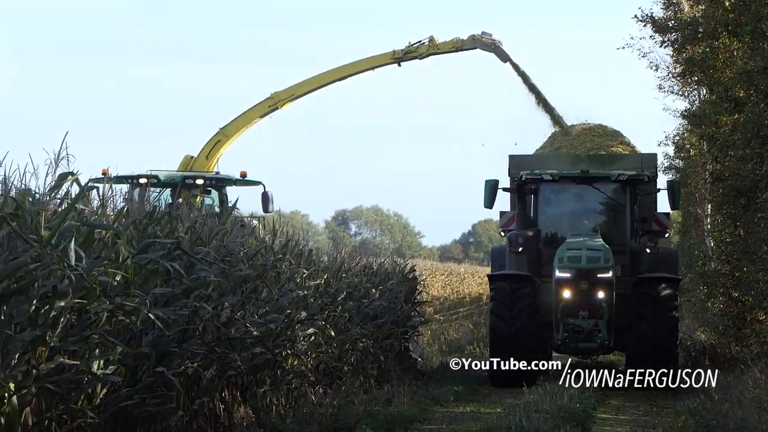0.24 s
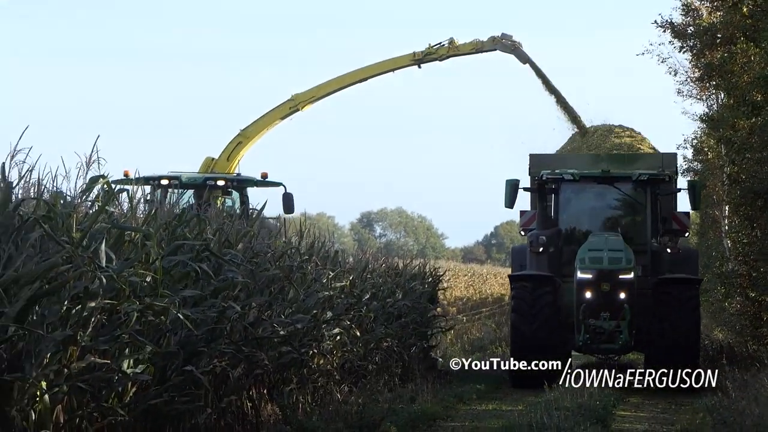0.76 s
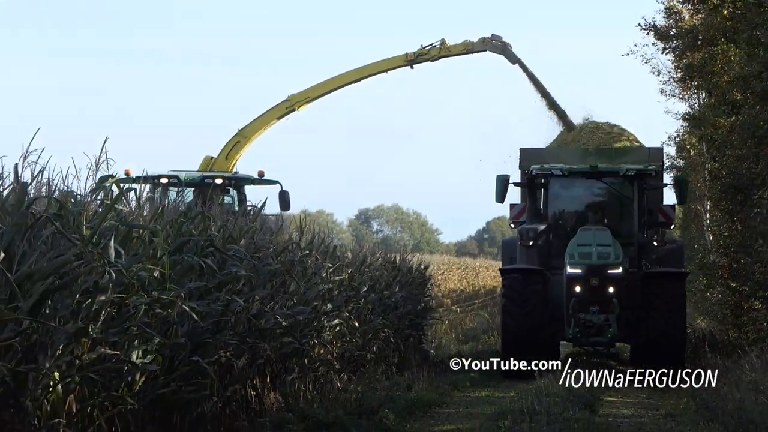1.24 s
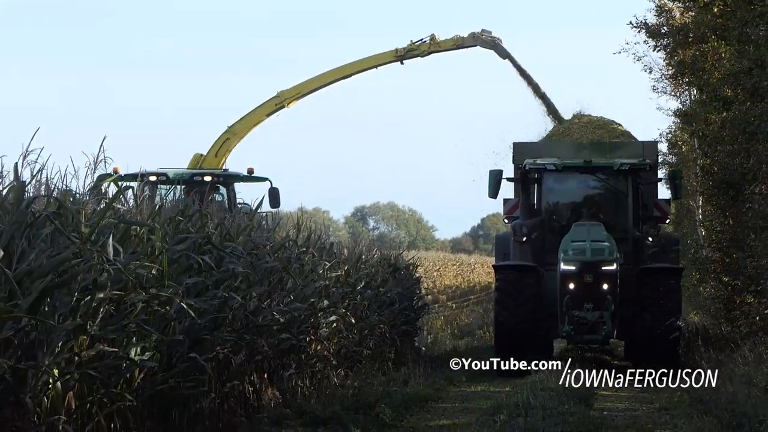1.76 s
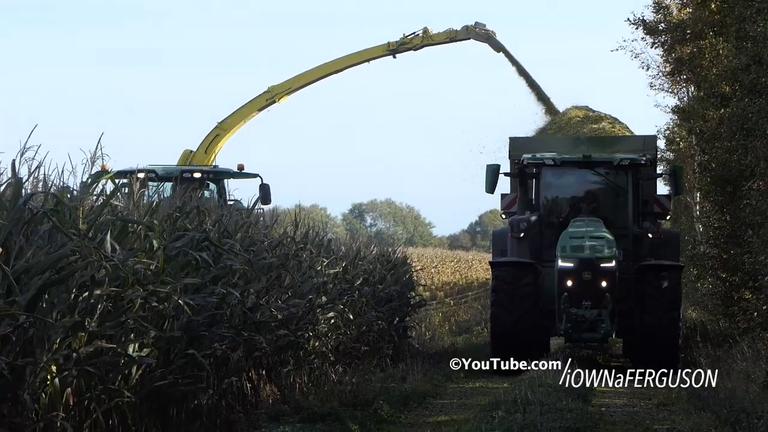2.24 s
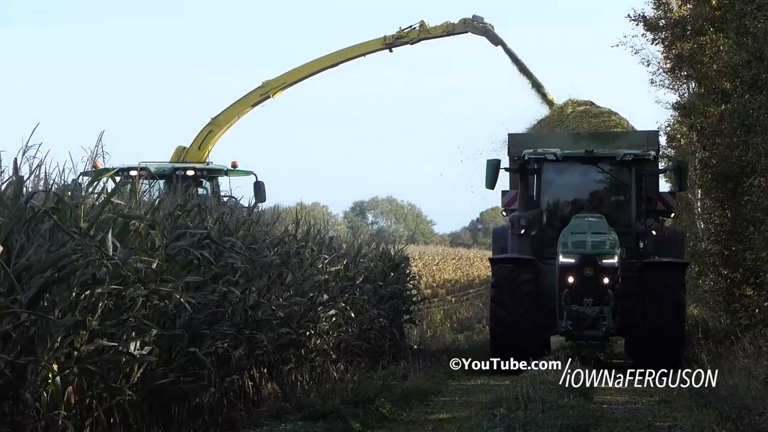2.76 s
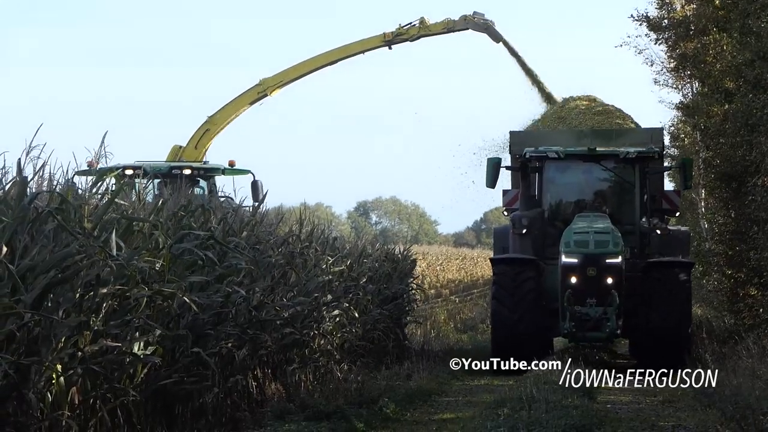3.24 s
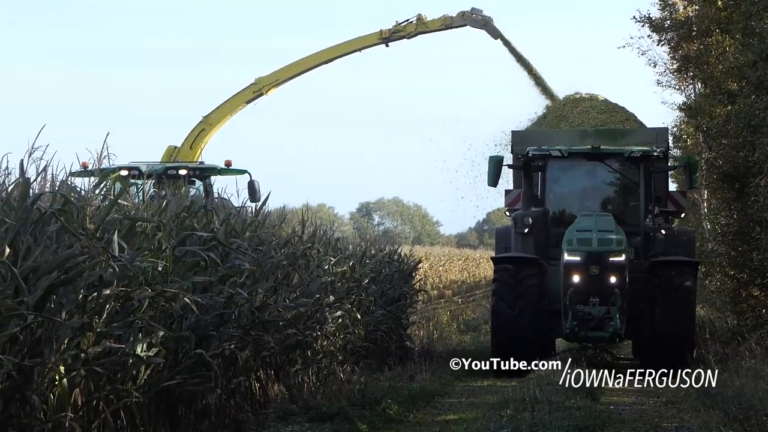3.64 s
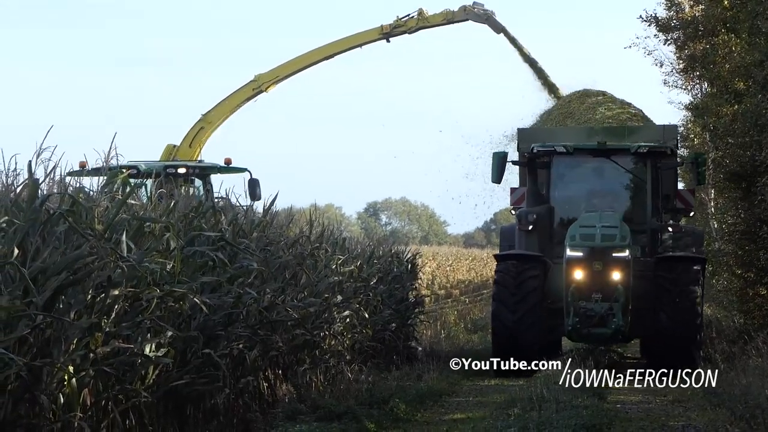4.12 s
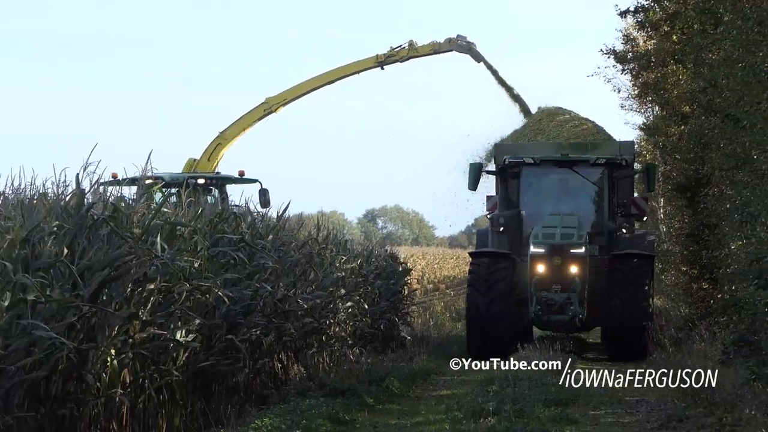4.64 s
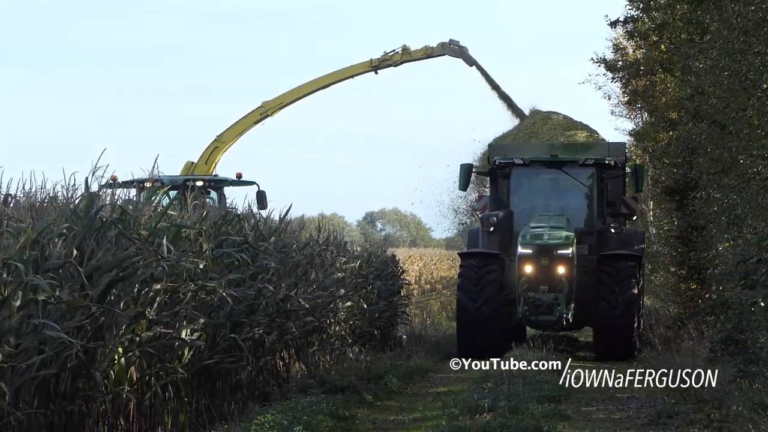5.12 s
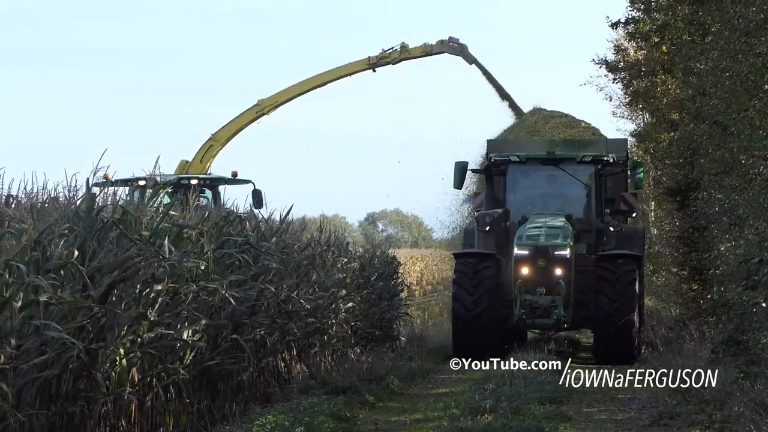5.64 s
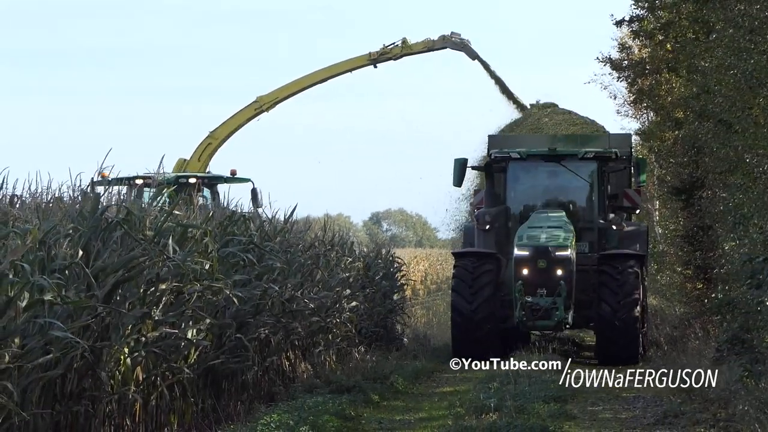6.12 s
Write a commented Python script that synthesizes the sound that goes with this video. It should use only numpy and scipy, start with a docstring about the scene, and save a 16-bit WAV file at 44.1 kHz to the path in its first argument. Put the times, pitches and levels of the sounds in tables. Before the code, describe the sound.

A forage harvester works in a maize field beside a tractor and trailer. A thick low roar and engine drone run throughout, with a knife drum humming and throbbing unevenly. Chopped crop hisses, crunches and rattles through the ringing steel spout. Thin whistles appear after four seconds, and squeaks crowd together near the end. Mono, outdoors, with constant distance and no obvious echo.

```python
"""A forage harvester chops maize, heard in mono as one steady machine that neither nears nor leaves. From the
start noise roars, and engine orders, further engine-tied tones and panels drone as sines and noise bands. The
knife drum fades in within 0.2 s, then throbs unevenly, loudest near 3.6 s; hums swell throughout. Chopped crop
rattles up the steel spout from the outset: filtered noise clumps, ringing chips and chirps. Thin whistles come
after 4 s; hard pieces squeak along the spout, most crowded in the last 1.5 s."""
import sys
import numpy as np
from scipy import signal
from scipy.fft import rfft, irfft, next_fast_len
from scipy.io import wavfile
from scipy.ndimage import uniform_filter1d, map_coordinates

SR = 44100
rng = np.random.default_rng(int(sys.argv[2]) if len(sys.argv) > 2 else 0)


def bounce(signal):
    """Save signal as a 16-bit WAV file at the path given by the first command-line argument."""
    frames = np.transpose(np.atleast_2d(signal))
    limited = np.clip(frames, -1, 1)
    pcm = np.round(limited * 32767).astype(np.int16)
    wavfile.write(sys.argv[1], SR, pcm)


N = 280917  # samples, about 6.37 s


def amp(db):
    """Turns decibels into an amplitude factor."""
    return 10 ** (np.asarray(db) / 20)


def evened(x):
    """Scales x to rms 1."""
    return x / np.sqrt(np.mean(x ** 2) + 1e-20)


def curve(rows):
    """Columns of a time table, joined by straight lines, one value a sample."""
    s, *columns = np.transpose(rows)
    return [np.interp(np.arange(N) / SR, s, column) for column in columns]


def wander(hz):
    """Smooth chance of rms 1 with changes up to about hz."""
    knots = rng.standard_normal(1024)
    places = np.arange(N) / SR * 2 * hz % 1023
    return evened(map_coordinates(knots, [places], order=3))


def coloured(x, points):
    """Shapes x by a spectrum drawn on a log-frequency axis, rms 1."""
    hz, db = np.transpose(points)
    size = next_fast_len(N)
    bins = np.fft.rfftfreq(size, 1 / SR)
    gain_db = np.interp(np.log(bins + 1), np.log(hz + 1), db, right=-150)
    return evened(irfft(rfft(x, size) * amp(gain_db), size)[:N])


def patchy(x, depth_db, size):
    """Random patches of size (bins, frames) grow louder or softer; rms 1."""
    spectrum = signal.stft(x, nperseg=512, noverlap=384)[2]
    patches = uniform_filter1d(rng.standard_normal(spectrum.shape), size[0], 0)
    patches = uniform_filter1d(patches, size[1], 1)
    shaped = spectrum * amp(depth_db * evened(patches))
    return evened(signal.istft(shaped, nperseg=512, noverlap=384)[1][:N])


def tone(hz, flutter_db, flutter_hz):
    """A sine of rms 1 whose level flutters at random."""
    turns = np.cumsum(hz) / SR + rng.random()
    return evened(np.sin(2 * np.pi * turns) * amp(flutter_db * wander(flutter_hz)))


def fuzzy(hz, width_hz):
    """A narrow band of noise of rms 1 riding on the curve hz."""
    angle = 2 * np.pi * np.cumsum(hz) / SR
    return evened(wander(width_hz / 2) * np.cos(angle) + wander(width_hz / 2) * np.sin(angle))


def resonate(x, hz, width_hz):
    """A resonance of gain 1 that follows the curve hz."""
    turn = np.exp(2j * np.pi * np.cumsum(hz) / SR)
    r = np.exp(-np.pi * width_hz / SR)
    # shift the band down to 0 Hz, smooth it there, shift it back
    return 2 * (turn * signal.lfilter([1 - r], [1, -r], x / turn)).real


# Fans, rollers, tyres and exhaust gas. Each row: pitch in Hz, relative level in dB per Hz.
ROAR_COLOUR = [(6, -30.5), (11, -7), (45, -10), (100, -3), (150, -0.5), (225, -4), (275, 0), (320, -1.5),
               (365, -2), (420, -8), (520, -13.5), (650, -20.5), (800, -22), (1100, -17.5), (1500, -22),
               (1850, -25.5), (2100, -28), (3000, -30.5), (3800, -38), (4500, -58)]
# Slow swells of the roar. Each row: time in seconds, gain of the upper part in dB, gain of the bass in dB.
ROAR_SWELL = [(0.0, 0, -0.5), (0.38, -1, 1), (0.48, 1, 4.5), (0.7, -2.5, 2), (1.44, -0.5, -3), (1.54, 0, 5),
              (1.63, 0, -1), (2.2, -0.5, 2), (3.28, 0.5, 1.5), (3.42, 0, 4), (3.52, 0, -1.5),
              (4.04, -0.2, 1.5), (5.8, -1.5, -2.5), (6.37, -0.2, 0)]
ROAR_DB = -19.5  # rms of the whole noise before the swells


def roar():
    """Broad lumpy noise; its bass and its upper part rise and fall separately, unevenly."""
    upper_db, bass_db = curve(ROAR_SWELL)
    noise = patchy(coloured(rng.standard_normal(N), ROAR_COLOUR), depth_db=0.79, size=(3, 40))
    bass = signal.sosfiltfilt(signal.butter(2, 190, fs=SR, output="sos"), noise)
    upper = noise - bass
    return amp(ROAR_DB) * (amp(bass_db) * bass + amp(upper_db + 0.48 * wander(7.0)) * upper)


# Housing resonances in the roar. Each row: pitch in Hz, level in dB rms, width in Hz.
PANELS = [(939, -46.5, 40), (1065, -55, 36), (1446, -45.5, 110), (1830, -46, 120)]


def housings():
    """Panels of the machine hum along in bands of noise at fixed pitches."""
    return sum(amp(db) * fuzzy(np.full(N, hz), width) for hz, db, width in PANELS)


# Whistles from the machine. Each row: start in seconds, length in seconds, mid-swell level in dB rms,
# pitch in Hz.
WHISTLE_ROWS = [(4.14, 0.26, -37.5, 560), (5.5, .12, -36, 1490), (5.24, 0.16, -39.5, 1300),
                (4.95, 0.23, -46, 940), (4.3, 0.24, -39, 860), (5.82, 0.17, -37, 1505),
                (5.72, 0.088, -48, 1500)]


def whistles():
    """Thin wavering tones that swell and fade within a fraction of a second."""
    t = np.arange(N) / SR
    out = np.zeros(N)
    for start, length, db, hz in WHISTLE_ROWS:
        swell = np.sin(np.pi * np.clip((t - start) / length, 0, 1))
        out += amp(db) * swell * tone(hz + 6.0 * wander(8.7), 1.5, 10.0)
    return out


# Exhaust tones. Each row: multiple of the engine speed, level in dB rms.
EXHAUST_ORDERS = [(1, -35.5), (2, -40.5), (4, -30.5), (5, -33), (7, -40.5), (8, -49.5), (10, -52)]
# Further tones that follow the engine speed. Each row: ratio to the engine speed, level in dB rms, width in Hz.
LOCKED_TONES = [(0.71, -45, 2.7), (1.3, -31, 1.5), (1.083, -44.5, 1.5), (2.83, -40.5, 4.8),
                (3.4, -37.5, 2.2), (7.3, -46.5, 5), (5.24, -35.5, 2.4), (9.72, -54.5, 6.9)]


def engine(speed):
    """Clean exhaust orders and the less steady hum of further tones tied to the engine speed."""
    orders = sum(amp(db) * tone(k * speed, flutter_db=2.5, flutter_hz=3.8) for k, db in EXHAUST_ORDERS)
    locked = np.zeros(N)
    for ratio, db, width in LOCKED_TONES:
        blur = fuzzy(ratio * speed, width)
        locked += amp(db) * evened(tone(ratio * speed, 2.4, 3.4) + 0.44 * blur)
    return orders + locked


# Hums that swell and sink unevenly. Each row: time in seconds, gearbox hum in dB rms,
# third exhaust order in dB rms, pair near the sixth order in dB rms.
HUM_LEVELS = [(0.0, -31, -32, -35), (0.03, -33, -27.5, -23.5), (1.29, -34, -29, -33),
              (1.35, -40, -41, -20.5), (1.38, -31, -25, -24), (1.47, -33, -26.5, -39),
              (1.56, -18, -28, -22), (1.61, -35, -31, -34), (1.67, -21, -21.5, -30), (1.76, -44, -37, -25),
              (1.88, -22, -27, -28.5), (1.95, -36, -30, -30), (2.0, -27, -24, -34), (2.06, -27, -34, -30),
              (2.15, -32, -24, -22), (3.0, -33.5, -33.5, -32), (3.03, -22.5, -19, -35),
              (3.12, -35, -37, -25), (3.23, -30, -31, -35), (3.3, -35, -29, -26), (3.41, -16, -20, -28),
              (3.48, -31.5, -30.5, -21.5), (3.76, -34, -27, -38), (3.83, -30, -24, -25),
              (4.1, -33, -26, -25.5), (4.17, -39, -37, -38), (4.2, -19.5, -38, -32), (4.35, -35, -37, -26),
              (4.43, -24, -42, -22), (4.54, -38, -23, -26.5), (4.65, -25, -29, -29),
              (4.7, -44, -28.5, -25.5), (5.14, -28.5, -28.5, -31.5), (6.19, -29, -32, -23),
              (6.28, -31, -22, -26), (6.37, -20, -21, -44)]
GEAR_RATIO, PAIR_RATIO = 2.265, 5.77  # over the engine speed
PAIR_DB = 1  # lower tone of the pair against the sixth order


def hums(speed):
    """A blurred gearbox hum, the third exhaust order, and a beating pair at the sixth."""
    gear_db, third_db, pair_db = curve(HUM_LEVELS)
    gear_tone = tone(GEAR_RATIO * speed + 3.0 * wander(4.0), 2.1, 7.0)
    gear = evened(gear_tone + 0.72 * fuzzy(GEAR_RATIO * speed, 30.0))
    third = tone(3 * speed, 0.68, 5.8)
    lower = evened(tone(PAIR_RATIO * speed, 2.8, 8.0) + 0.6 * fuzzy(PAIR_RATIO * speed, 10.0))
    pair = evened(tone(6 * speed, 1.9, 5.4) + amp(PAIR_DB) * lower)
    return amp(gear_db) * gear + amp(third_db) * third + amp(pair_db) * pair


# Clumps of crop shooting up the spout. Each row: time of the peak in seconds, peak strength in dB.
CLUMP_PEAKS = [(0.025, -46), (0.088, -39), (0.254, -54.5), (0.381, -52.5), (0.537, -49.5), (0.649, -54.5),
               (0.723, -50.5), (0.853, -47.5), (0.983, -52.5), (1.188, -55.5), (1.368, -53.5),
               (1.422, -48.5), (1.517, -49), (1.678, -49.5), (1.816, -49), (1.945, -50.5), (2.26, -50),
               (2.614, -51), (2.749, -52), (2.943, -50), (3.003, -52), (3.198, -50.5), (3.265, -52.5),
               (3.335, -53), (3.392, -48), (3.477, -48.5), (3.617, -56), (3.802, -48.5), (3.935, -49.5),
               (4.334, -51.5), (4.45, -56), (4.532, -51), (4.629, -50), (4.899, -50), (5.004, -50),
               (5.11, -49.5), (5.218, -51.5), (5.358, -44), (5.483, -50), (5.598, -50), (5.767, -46.5),
               (5.816, -48.5), (5.932, -45), (6.031, -55), (6.266, -46)]
CLUMP_RISE_S, CLUMP_FALL_S = 0.013, 0.014


def clumps():
    """Strength of the passing clumps: each swells quickly and dies a little more slowly."""
    t, power = np.arange(N) / SR, np.zeros(N)
    for s, db in CLUMP_PEAKS:
        near = slice(max(round((s - 0.05) * SR), 0), round((s + 0.1) * SR))
        u = t[near] - s
        power[near] += amp(2 * db) * np.exp(-(u / np.where(u < 0, CLUMP_RISE_S, CLUMP_FALL_S)) ** 2)
    return np.sqrt(power)


# Even flow of crop. Each row: time in seconds, ringing of the spout in dB rms,
# strength of the hiss in dB on the scale of the clumps.
CROP_FLOW = [(0.0, -40.5, -53), (0.34, -40.5, -52), (1.45, -44, -55), (2.13, -42.5, -52.5),
             (2.45, -46.5, -56.5), (3.32, -43, -52), (3.6, -44, -54.5), (5.32, -41, -52),
             (5.46, -41.5, -53), (6.37, -40.5, -50)]
# Colour of the chaff hiss. Each row: pitch in Hz, relative level in dB per Hz.
HISS_COLOUR = [(700, -9.5), (2000, -1), (2900, -8), (3900, -17.5), (4500, -17.5), (5500, -15.5),
               (6400, -22.5), (7400, -18.5), (8100, -33.5), (9200, -27), (10300, -40.5), (11200, -33),
               (12000, -43), (15000, -51)]
HISS_LIFT_DB = 10  # the whole hiss over the strength of flow and clumps
CLUMP_THIN_HZ, CLUMP_DULL_HZ = 2480, 9000  # clump hiss weakens below and above these pitches


def chaff():
    """Fine hiss: an even flow and duller clumps, in patches that flutter differently at each pitch."""
    flow, clump = amp(curve(CROP_FLOW)[1] + 1.1 * wander(11.0)), clumps()
    band = signal.butter(1, [CLUMP_THIN_HZ, CLUMP_DULL_HZ], "band", fs=SR)
    puffs = signal.lfilter(*band, clump * rng.standard_normal(N))
    stream = amp(0.76 * wander(30.0)) * (flow * rng.standard_normal(N) + puffs)
    hiss = patchy(coloured(stream, HISS_COLOUR), depth_db=1.5, size=(9, 10))
    return amp(HISS_LIFT_DB) * np.sqrt(np.mean(flow ** 2 + clump ** 2)) * hiss


# Colour of the coarse rush in a clump. Each row: pitch in Hz, relative level in dB per Hz.
CRUNCH_COLOUR = [(500, -21.5), (1000, 1), (1900, 1), (3000, -9), (4500, -21.5)]
CRUNCH_DB = 8.5  # over the strength of the clumps


def crunch():
    """Each clump also brings a coarse rush of grains in the middle range."""
    struck = rng.random(N) < 1500 / SR  # 1500 grains a second
    grains = amp(2.2 * np.minimum(rng.exponential(1, N), 4)) * rng.standard_normal(N) * struck
    return amp(CRUNCH_DB) * clumps() * coloured(grains, CRUNCH_COLOUR)


SNAPS_PER_S, SNAPS_DB = 88, -65  # over all pitches together; level in dB rms


def snaps():
    """Brittle bits snap: bright chirps of a few milliseconds fall in pitch, louder inside clumps."""
    t, out = np.arange(400) / SR, np.zeros(N)
    for hz in np.geomspace(4400, 7400, num=12):
        struck = rng.random(N) < SNAPS_PER_S / 12 / SR
        train = amp(2.7 * np.minimum(rng.exponential(1, N), 4)) * struck
        chirp = t / 0.0015 * np.exp(-t / 0.0017) * np.sin(2 * np.pi * hz * (t - 17.0 * t ** 2))
        out += signal.oaconvolve(train, chirp)[:N]
    return amp(SNAPS_DB) * evened(out * np.hypot(amp(curve(CROP_FLOW)[1]), clumps()))


# Modes of the steel spout. Each row: pitch in Hz, width in Hz, relative gain in dB.
SPOUT_MODES = [(3260, 466, 1), (3377, 250, 1), (3496, 120, 3), (3630, 60, -4)]
SPOUT_DRIFT = 0.02  # rms share by which the ringing drifts in pitch
CLUMP_RING_DB = 7  # ringing of a clump over its strength


def spout():
    """A dense stream of chips keeps the steel ringing; sliding pieces add a wavering squeal."""
    flow = np.hypot(amp(curve(CROP_FLOW)[0] + 1.5 * wander(14.0)), amp(CLUMP_RING_DB) * clumps())
    struck = rng.random(N) < 3000 / SR  # 3000 chips a second
    chips = amp(0.73 * np.minimum(rng.exponential(1, N), 5)) * rng.standard_normal(N) * struck
    drift = 1 + SPOUT_DRIFT * wander(18.0)
    ring = np.zeros(N)
    for hz, width, db in SPOUT_MODES:
        ring += amp(db) * resonate(resonate(chips, hz * drift, width), hz * drift, 2 * width)
    squeal = tone(3600 + 110 * wander(25.0), flutter_db=1.5, flutter_hz=29.4)
    return flow * amp(1.0 * wander(40.0)) * evened(evened(ring) + amp(-5.5) * squeal)


# Hard pieces squeaking along the spout. Each row: start in seconds, level in dB before shape and grit,
# pitch in Hz half of KNOCK_LENGTH_S after the start.
SPOUT_KNOCKS = [(0.078, -22.5, 3570), (0.2803, -31.5, 3600), (0.2982, -28.5, 3600), (0.3711, -36, 3570),
                (0.4529, -34, 3470), (0.5192, -30, 3670), (0.7193, -23.5, 3460), (0.851, -32, 3400),
                (0.9039, -30, 3400), (0.9722, -33, 3450), (1.1558, -30, 3650), (1.2072, -33, 3490),
                (1.3526, -36, 3610), (1.4015, -44, 3380), (1.4174, -34, 3430), (1.8093, -35, 3500),
                (1.9556, -34, 3350), (1.9849, -41, 3493), (2.147, -38, 3560), (2.2583, -30, 3660),
                (2.309, -31, 3580), (2.5446, -36, 3470), (2.6805, -37, 3377), (2.811, -38, 3490),
                (2.8918, -29, 3302), (3.0744, -34, 3500), (3.1972, -31, 3400), (3.249, -37, 3500),
                (3.3592, -28.5, 3596), (3.7504, -41, 3540), (3.8836, -34, 3620), (3.918, -34, 3490),
                (4.1223, -30, 3430), (4.1889, -33, 3447), (4.2592, -27, 3515), (4.3012, -28, 3590),
                (4.335, -25.5, 3430), (4.5146, -31, 3590), (4.6248, -36, 3600), (4.6425, -30, 3638),
                (4.725, -31, 3330), (4.8963, -24, 3476), (4.9656, -31, 3480), (5.0903, -25.5, 3675),
                (5.1058, -27, 3670), (5.1522, -28, 3530), (5.2096, -29, 3440), (5.3143, -37, 3460),
                (5.3333, -29, 3600), (5.4149, -26.5, 3620), (5.447, -31, 3580), (5.5173, -34, 3600),
                (5.5418, -29, 3610), (5.5912, -36, 3590), (5.6082, -26, 3590), (5.7284, -34, 3730),
                (5.7528, -30, 3740), (5.808, -28, 3658), (5.8636, -29, 3660), (5.879, -27, 3610),
                (5.9293, -32, 3580), (6.0117, -27, 3650), (6.0247, -24, 3580), (6.0797, -27.5, 3590),
                (6.136, -32, 3435), (6.1594, -28, 3570), (6.2163, -29, 3640), (6.2322, -33, 3450),
                (6.2651, -22, 3490), (6.279, -23, 3520), (6.3204, -36, 3420), (6.3435, -25, 3464)]
KNOCK_RISE_S, KNOCK_LENGTH_S, KNOCK_SAG_HZ_PER_S = 0.004, 0.0092, 5700
KNOCK_GRIT = 0.36  # share of scraping roughness


def knocks():
    """Each hard piece scrapes along the spout: a quick start, a pitch that sags, a rounded end."""
    out, t = np.zeros(N + 2000), np.arange(2000) / SR
    for s, db, hz in SPOUT_KNOCKS:
        grit = 1 + KNOCK_GRIT * evened(np.convolve(rng.standard_normal(2000), np.hanning(110), "same"))
        shape = np.minimum(t / KNOCK_RISE_S, 1) * np.exp(-(t / KNOCK_LENGTH_S) ** 2)
        turns = hz * t - KNOCK_SAG_HZ_PER_S * (t - KNOCK_LENGTH_S / 2) ** 2 / 2
        out[round(s * SR):][:2000] += amp(db) * shape * grit * np.sin(2 * np.pi * turns)
    return out[:N]


# Longer chirps sliding down through the treble. Each row: time in seconds (the peak follows half of
# SLIDE_S later), peak level in dB before grit, pitch at the peak in Hz.
TREBLE_SLIDES = [(1.415, -49, 7200), (1.81, -53, 6900), (3.098, -53, 7000), (3.187, -50, 5700),
                 (3.26, -51, 5850), (3.325, -49, 5950), (3.472, -52, 5300), (4.33, -50, 5492),
                 (4.625, -50, 5000), (5.765, -50, 5250), (6.187, -47, 5600), (6.23, -45, 5500),
                 (6.262, -47, 5400)]
SLIDE_S, SLIDE_FALL_PER_S = 0.007, 11  # half length; share of the pitch lost a second


def slides():
    """Each slide is a rough tone that swells and fades while its pitch falls."""
    out, t = np.zeros(N + 1600), (np.arange(1600) - 400) / SR
    u = t - SLIDE_S / 2
    for s, db, hz in TREBLE_SLIDES:
        grit = 1 + 0.17 * evened(np.convolve(rng.standard_normal(1600), np.hanning(60), "same"))
        wave = np.sin(2 * np.pi * hz * (u - SLIDE_FALL_PER_S * u ** 2 / 2))
        out[round(s * SR):][:1600] += amp(db) * np.exp(-(u / SLIDE_S) ** 2) * grit * wave
    return out[400:][:N]  # the lead of 400 samples before each time


# Showers of tones: stalks being cut, then small pieces skidding along the spout. Each row:
# lowest pitch in Hz, highest in Hz, number a second, half width of the bell in seconds, level in dB rms.
STALK_CHOPS = (751, 1900, 258.5, 0.3, -41.5)
SKID_SQUEAKS = (3303, 3759.5, 129, 0.1, -49)


def scatter(low_hz, high_hz, per_s, half_s, db):
    """A shower of tones of 16 pitches under a bell cut off at 27 ms, some rising and some falling."""
    u, out = (np.arange(1200) - 600) / SR, np.zeros(N)
    for hz in np.geomspace(low_hz, high_hz, num=16):
        struck = rng.random(N) < per_s / 16 / SR
        train = amp(2.8 * np.minimum(rng.exponential(1, N), 4)) * struck
        glide = 4.0 * rng.uniform(-1, 1)
        chirp = np.exp(-(u / half_s) ** 2) * np.sin(2 * np.pi * hz * (u + glide * u ** 2))
        out += signal.oaconvolve(train, chirp)[:N]
    return amp(db) * evened(out * amp(1.3 * wander(6.0)))


# Drift of the knife tone. Each row: time in seconds, pitch in Hz,
# second partial in dB rms, third partial in dB rms.
KNIFE_PITCH = [(0.0, 275.8, -33.5, -47.0), (0.2, 278.8, -39.5, -58), (0.4, 277.8, -36.5, -52),
               (0.6, 276.0, -45, -54), (0.8, 280.0, -42.0, -46), (1.0, 280.4, -41, -53),
               (1.2, 281.0, -38, -47.5), (1.4, 281.7, -40.0, -51), (1.6, 277.6, -39, -54),
               (1.8, 276.8, -39.5, -44), (2.0, 279.5, -37.5, -49), (2.2, 279.6, -34.5, -44),
               (2.4, 282.4, -36, -48), (2.6, 281.4, -32.5, -43), (2.8, 281.4, -44, -46),
               (3.0, 277.8, -38.5, -51.0), (3.2, 278.8, -36, -49.0), (3.4, 280.2, -40, -54),
               (3.6, 278.2, -38, -45), (3.8, 277.7, -43, -45), (4.0, 279.2, -37.5, -43.5),
               (4.2, 280.3, -46, -47), (4.4, 281.8, -36.0, -40), (4.6, 281.0, -37, -41.5),
               (4.8, 280.1, -41.5, -41), (5.0, 279.7, -40, -45), (5.2, 280.2, -39.5, -49),
               (5.4, 281.4, -46, -47), (5.6, 282.8, -33, -48.0), (5.8, 283.2, -37.5, -50),
               (6.0, 279.8, -39.5, -43), (6.37, 281.2, -34.5, -44)]
# Strength of the knife tone. Each row: time in seconds, level in dB rms.
KNIFE_BITE = [(0.0, -46), (0.05, -31), (0.18, -18), (0.23, -30), (0.26, -17.5), (0.37, -19), (0.41, -39),
              (0.6, -18), (0.76, -19.5), (0.8, -35), (0.87, -18), (0.9, -32), (0.94, -20.5), (1.06, -16.5),
              (1.13, -25), (1.19, -22.5), (2.02, -25.5), (2.09, -17), (2.16, -29), (2.2, -23.5),
              (2.36, -15), (2.41, -31), (2.45, -22.5), (2.68, -17.5), (2.78, -26), (2.82, -18.5),
              (3.12, -19.5), (3.16, -25), (3.23, -18.5), (3.46, -27), (3.49, -34), (3.58, -10), (3.64, -26),
              (3.69, -15.5), (3.74, -30), (3.81, -14), (3.89, -32), (3.97, -18.5), (4.03, -32), (4.08, -18),
              (4.13, -17.5), (4.19, -31), (4.31, -16), (4.35, -28), (4.42, -14.5), (4.47, -30), (4.58, -17),
              (4.7, -24), (4.75, -13), (4.86, -29.5), (4.91, -13), (5.0, -22), (5.06, -14.5), (5.22, -16.5),
              (5.29, -35), (5.32, -20), (5.66, -17), (5.89, -30), (5.94, -17), (6.37, -22.5)]
# Blurred partials. Each row: multiple of the knife rate, level in dB rms, width in Hz.
KNIFE_BLUR = [(1, -33.5, 60), (2, -43.5, 30), (3, -50, 32), (4, -51, 27)]
KNIFE_RATIO = 4.535  # knife rate over the engine speed, for the blurred partials
STEADY_DB, THROB_HZ, WAVER_HZ = 13, 26, 1.4  # clean tone over its skirt; skirt width; rms pitch waver


def drum(speed):
    """The knife tone throbs as stalks feed in unevenly; blurred partials surround it."""
    hz, second_db, third_db = curve(KNIFE_PITCH)
    bite_db, = curve(KNIFE_BITE)
    hz = hz + WAVER_HZ * wander(6.0)
    clean = tone(hz, flutter_db=-0.4, flutter_hz=8.7)
    bite = amp(bite_db) * evened(amp(STEADY_DB) * clean + fuzzy(hz, THROB_HZ))
    second = amp(second_db) * tone(2 * hz + 3.0 * wander(9.0), 2.2, 11.0)
    third = amp(third_db) * tone(3 * hz + 5.0 * wander(8.0), 2.5, 9.0)
    blur = sum(amp(db) * fuzzy(k * KNIFE_RATIO * speed, width) for k, db, width in KNIFE_BLUR)
    return bite + second + third + blur


# Engine speed as its lowest strong exhaust tone. Each row: time in seconds, pitch in Hz.
ENGINE_SPEED = [(0.0, 62.3), (0.6, 61.55), (1.75, 61.55), (2.3, 61.95), (2.85, 62.0), (3.2, 61.65),
                (4.2, 61.55), (4.9, 62.4), (5.3, 61.95), (5.6, 62.0), (5.95, 62.65), (6.37, 62.3)]


def scene():
    """The machine and the crop in its spout, summed into one channel."""
    speed, = curve(ENGINE_SPEED)
    machine = roar() + housings() + whistles() + engine(speed) + hums(speed) + drum(speed)
    crop = chaff() + crunch() + snaps() + spout() + knocks() + slides()
    showers = scatter(*STALK_CHOPS) + scatter(*SKID_SQUEAKS)
    return (machine + crop + showers)[None]


def record(dry):
    """The band limit of the recorder: a steep low-pass at 15200 Hz."""
    lowpass = signal.firwin(511, 15200, window=("kaiser", 9), fs=SR)
    return signal.oaconvolve(dry, lowpass[None], "same")


dry = scene()
out = record(dry)
bounce(out)
```